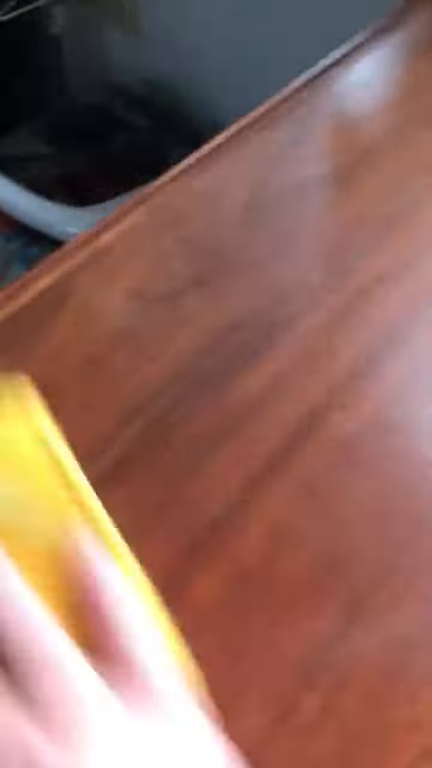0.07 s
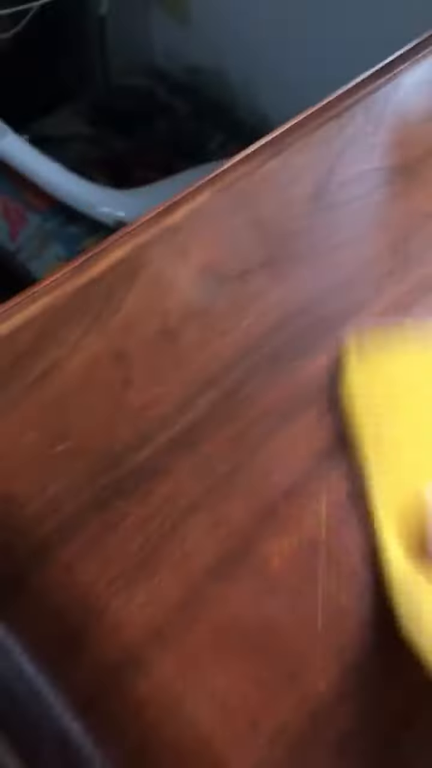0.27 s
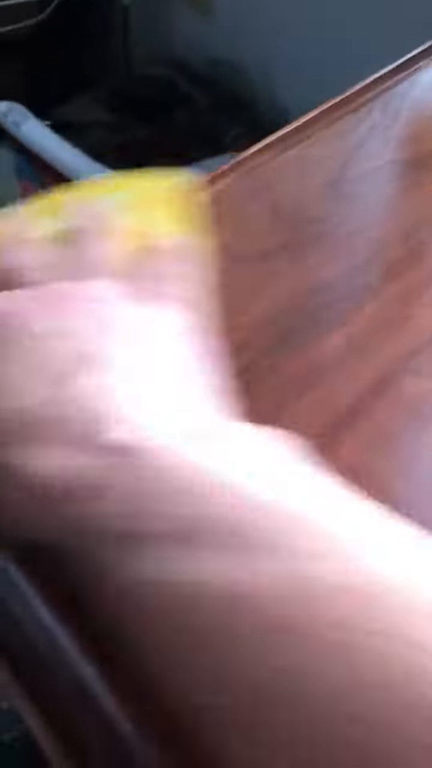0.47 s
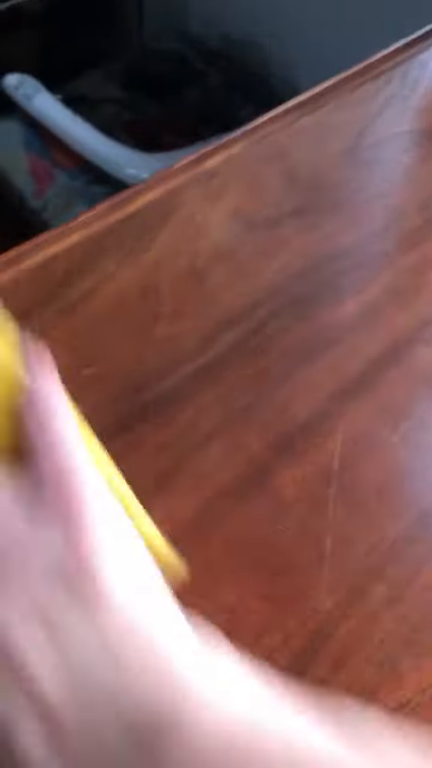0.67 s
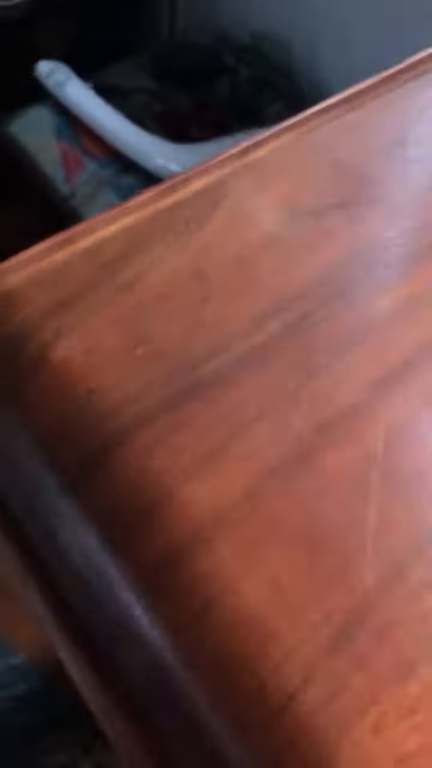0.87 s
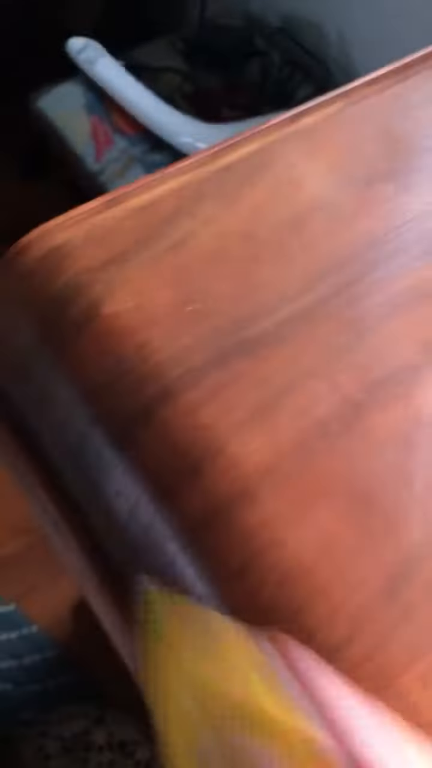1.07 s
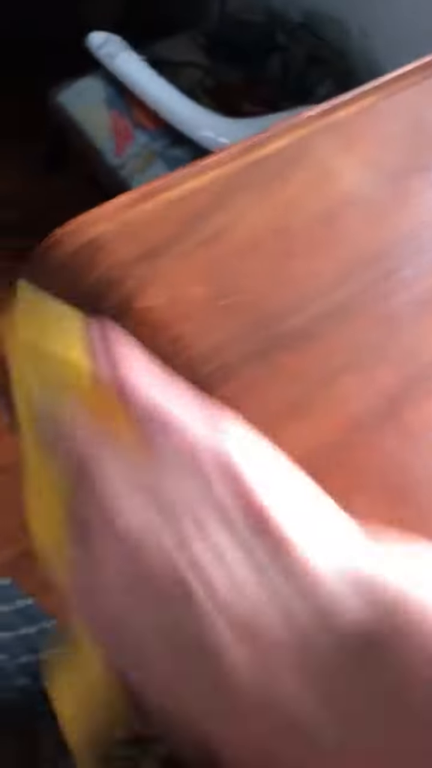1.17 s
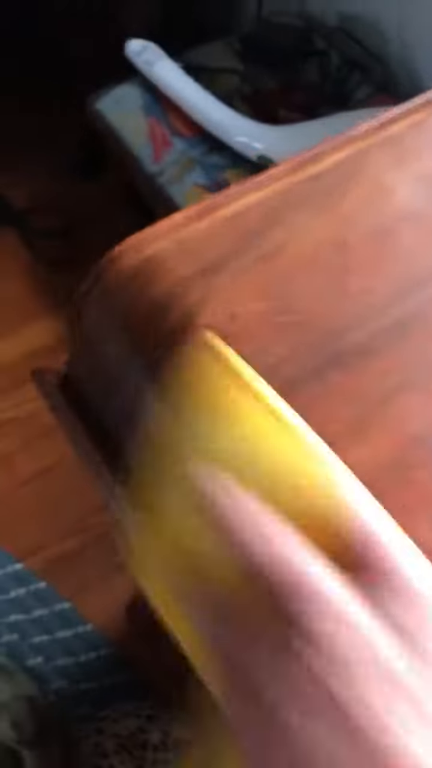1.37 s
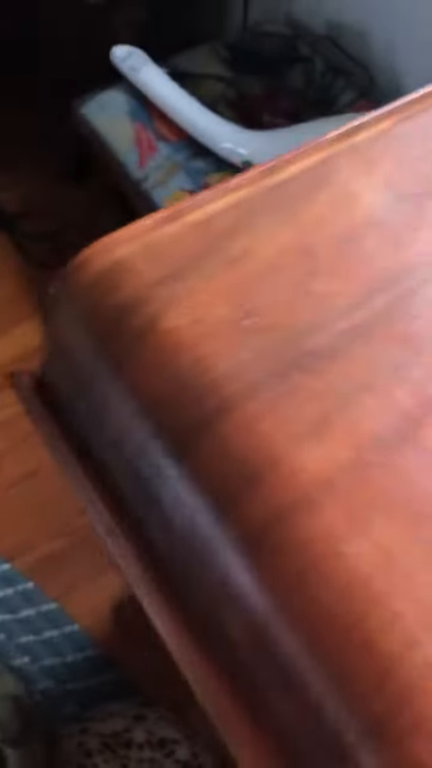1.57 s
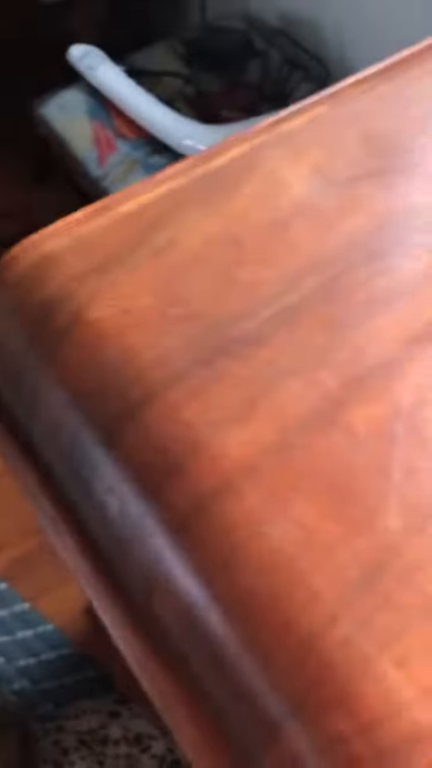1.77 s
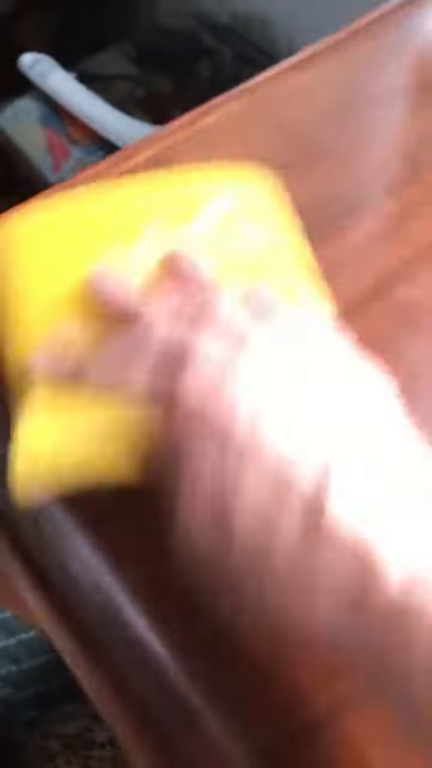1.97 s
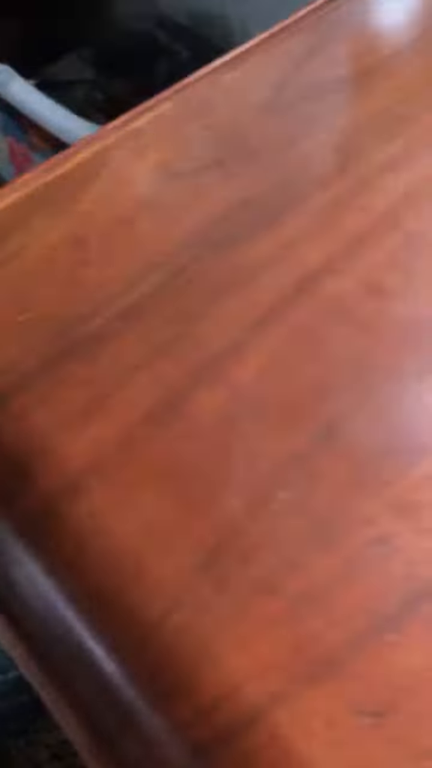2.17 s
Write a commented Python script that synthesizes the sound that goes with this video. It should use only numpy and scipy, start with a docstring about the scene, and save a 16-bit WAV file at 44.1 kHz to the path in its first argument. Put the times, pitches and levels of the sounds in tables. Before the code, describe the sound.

A soft cloth rubs back and forth over a waxed wooden table in seven quick, hissing strokes. The table gives a few light knocks and dull thumps early on. It is heard close by in a small, quiet room.

```python
"""Buffing a wooden table

A soft cloth rubs a waxed table top in seven quick strokes, close by in a small room.
Countless tiny fibre slips make a hiss that swells and brightens with the speed of the hand.
The wood murmurs under it, and a few jolts of the table each give a light knock and a dull thump.
Room air and a faint mains hum lie underneath."""
import sys
import numpy as np
from scipy import signal
from scipy.fft import rfft, irfft
from scipy.io import wavfile
from scipy.ndimage import uniform_filter1d

SR = 44100
rng = np.random.default_rng(int(sys.argv[2]) if len(sys.argv) > 2 else 0)


def persist_wave(psi):
    """Save psi, clipped to +-1, as 16-bit WAV."""
    counts = np.round(np.clip(psi, -1, 1) * 32767).astype(np.int16)
    wavfile.write(sys.argv[1], SR, np.atleast_2d(counts).T)


N = 98431
TIME = np.arange(N) / SR

# the tone of the room's still air: pitch_hz, level_db
AIR_SPECTRUM = [(20, -20), (55, -0.5), (100, -6.5), (170, -6.5), (320, -3.5), (500, -12.5), (900, -19.5),
                (2000, -15.5), (5000, -25), (10000, -29.5), (16000, -38)]
# the two tones of the mains hum: pitch_hz, level_db
HUM_TONES = [(59.6, -62.5), (120, -70.5)]
# the tone of the wood murmuring under the hand: pitch_hz, level_db
WOOD_SPECTRUM = [(20, -9), (45, 0), (90, 1.5), (130, 1.5), (160, -6.5), (230, -2), (300, -9.5), (380, -13),
                 (480, -23.5), (900, -28.5), (2000, -34)]
# how loud that murmur is: time_s, level_db
WOOD_LEVELS = [(0, -55.5), (.06, -52.5), (.13, -59), (.2, -48.5), (.3, -53), (.46, -55.5), (.6, -62.5),
               (.68, -55.5), (.76, -54.5), (.95, -66.5), (1.3, -63.5), (1.68, -66.5), (1.85, -65.5),
               (2.23, -61)]
# jolts of the table: start_s, knock_db, thump_db, thump_pitch_hz, thump_rise_s
JOLTS = [(0.038, -64, -54.5, 97, 0.01), (0.1933, -46.5, -32.5, 88.4, 0.0094),
         (0.243, -60.5, -38.5, 92, 0.0051), (.331, -47.5, -33.5, 90, 0.0079),
         (0.3817, -58.5, -38.5, 93, 0.0069), (.542, -85, -49, 65.5, 0.0075),
         (0.7173, -64, -42, 100, 0.0084), (.802, -75, -48, 96, 0.0067), (0.982, -59.5, -56, 285, 0.0043)]
# the tone of wood knocking on wood: pitch_hz, level_db
KNOCK_SPECTRUM = [(100, 5.5), (300, 1.5), (500, -2.5), (750, -1), (1000, 4), (1550, 2.5), (2300, -9),
                  (3500, -27), (8000, -23), (16000, -40)]
# low notes the table rings with after a thump: pitch_hz, level_db, fade_s
TABLE_NOTES = [(64, -13.5, .12), (122.6, -13.5, 0.39), (231, -20.5, 0.25), (284.4, -14, 0.089)]
# the tone of the slipping fibres: pitch_hz, level_db
HISS_SPECTRUM = [(200, -42), (700, -13), (1100, -10), (1450, -3.5), (2000, -3.5), (3000, -2), (4300, -1),
                 (4900, -4), (5250, -1.2), (7000, 0.1), (7500, -3), (8300, -0.5), (8650, -3.5), (9000, -3),
                 (9800, -2.5), (10300, -8), (11000, -5), (13000, -4.5), (14300, -7.5), (15700, -7)]
# one curve per stroke, following the hand's speed and pressure: time_s, level_db, treble_boost_db
STROKE_CURVES = [
    [(0, -53, 0), (.05, -53, -0.5), (.1, -55, 1.5), (.14, -51.5, -4.5), (.2, -51.5, -4), (.235, -59.5, 0.5),
     (.262, -61, 5.5), (.3, -62, 3.5)],
    [(.34, -60, 3.5), (.39, -60, 0.5), (.435, -55, 2), (.48, -57.5, .5), (.54, -59.5, -3), (.585, -66, 1),
     (.635, -66, 0)],
    [(.69, -57.5, -1.5), (.75, -53.5, -3.5), (.81, -50.5, -4.5), (.87, -55, 0), (.935, -55, -4),
     (.958, -63.5, 1), (.976, -74, 4)],
    [(1.01, -61, -3.5), (1.07, -54, -3), (1.13, -53.5, -1.5), (1.195, -53, -2.5), (1.265, -59, -2),
     (1.3, -68, 0.5)],
    [(1.35, -60, 0), (1.41, -55, 1), (1.45, -53.5, 1), (1.52, -50.5, 0), (1.555, -54.5, 4),
     (1.6, -56.5, -4), (1.645, -60.5, -3.5), (1.676, -78, 2)],
    [(1.7, -64, 0), (1.73, -57.5, 1), (1.82, -55, 4.5), (1.865, -52, 0), (1.89, -56.5, 2.5),
     (1.965, -56.5, 1.5), (2.015, -61.5, .5)],
    [(2.06, -56.5, -4), (2.1, -59, 6.5), (2.16, -56, 1), (2.23, -60, 3.5)],
]
# the ring of the hollow in the cupped cloth as the hand moves: time_s, pitch_hz, boost_db
CLOTH_HOLLOW = [(.03, 1700, 5.5), (.16, 1880, 7.5), (.3, 2580, 1), (.46, 1500, 5), (.68, 1600, 4.5),
                (.79, 2760, 2), (.9, 3300, 2.5), (1.1, 3450, 5), (1.22, 2510, 1.5), (1.45, 3520, 1.5),
                (1.55, 3560, 5.5), (1.9, 2040, -0.5), (2.15, 5600, -1)]
# the rise and fall of the very highest hiss: time_s, boost_db
TOP_BOOST = [(.05, 5.5), (.27, 1.5), (.45, 2.5), (.85, -1), (1.16, 1.5), (1.32, 8), (1.5, -4.5),
             (1.85, -.5), (2.15, -2)]
# the cloth catches on the wax: time_s, half_length_s, level_db, pitch_hz, width_octaves
WAX_CATCHES = [(0.187, 0.0028, -47.5, 8000, 1.6), (.789, 0.0068, -51.5, 2860, 0.05),
               (1.198, 0.018, -59.5, 1600, .3), (1.862, 0.0087, -50.5, 3500, 4.3),
               (1.95, 0.037, -58, 2070, 0.46)]


def amp(db):
    """Turns decibels into a number to multiply by."""
    return 10 ** (np.asarray(db) / 20)


def fade(t, fade_s):
    """Dies away by 60 dB every fade_s seconds."""
    return amp(-60 * t / fade_s)


def unit(x):
    """Scales each column to an average power of one."""
    return x / np.sqrt(np.mean(x ** 2, axis=0) + 1e-20)


def follow(rows, t):
    """Reads every column of a curve at the times t."""
    s, *columns = np.transpose(rows)
    return [np.interp(t, s, column) for column in columns]


def level_at(spectrum, hz):
    """Reads a spectrum's level in dB at the pitches hz."""
    pitch_hz, level_db = np.transpose(spectrum)
    return np.interp(np.log(hz + 1), np.log(pitch_hz), level_db)


def bell(hz, centre_hz, octaves):
    """A smooth hill of height one around a pitch."""
    return np.exp(-.5 * (np.log2((hz + 1) / centre_hz) / octaves) ** 2)


def shaped_noise(gain):
    """Noise whose strength at each pitch is shaped by gain(hz)."""
    hz = np.fft.rfftfreq(N, 1 / SR)
    return unit(irfft(rfft(rng.standard_normal(N)) * gain(hz), N))


def noise(spectrum):
    """Noise with the tone given in a table."""
    return shaped_noise(lambda hz: amp(level_at(spectrum, hz)))


def wobble(depth_db, rate_hz):
    """A gain that wanders up and down at random."""
    return amp(depth_db * shaped_noise(lambda hz: bell(hz, rate_hz, octaves=1)))


def air_and_hum():
    """The soft rush of room air and a steady mains hum."""
    hum = sum(amp(db) * np.sqrt(2) * np.sin(2 * np.pi * (hz * TIME + rng.random()))
              for hz, db in HUM_TONES)
    return amp(-63.5) * noise(AIR_SPECTRUM) + hum


def room_echo(sound):
    """The walls send back a short, faint tail of scattered echoes."""
    t = TIME[:SR // 2]
    echoes_per_s = 2000
    echoes = rng.standard_normal(len(t)) * (rng.random(len(t)) < echoes_per_s / SR)
    echoes *= (t > .004) * fade(t, fade_s=0.098)
    return amp(-12.5) * signal.fftconvolve(sound, echoes / np.linalg.norm(echoes))[:N]


def wood_murmur():
    """The dragging hand shakes the table top in uneven lumps."""
    lumps = unit(wobble(depth_db=2, rate_hz=26))
    level_db, = follow(WOOD_LEVELS, TIME)
    return noise(WOOD_SPECTRUM) * amp(level_db) * lumps


def table_jolts():
    """A short wooden knock, then the top heaves for about two swings and its low notes ring on."""
    knock_rise_s, thump_delay_s = 0.00039, 0.0048
    out = np.zeros(N)
    for start_s, knock_db, thump_db, thump_hz, rise_s in JOLTS:
        t = np.maximum(TIME - start_s, 0)
        tail = fade(t, fade_s=0.027) + amp(-5) * fade(t, fade_s=0.25)
        out += amp(knock_db) * np.minimum(t / knock_rise_s, 1) * tail * noise(KNOCK_SPECTRUM)
        t = np.maximum(t - thump_delay_s, 0)
        heave = (t / rise_s * np.exp(1 - t / rise_s)) ** 2 * np.sin(2 * np.pi * thump_hz * t)
        ring = sum(amp(db) * fade(t, fade_s) * np.sin(2 * np.pi * hz * t)
                   for hz, db, fade_s in TABLE_NOTES)
        out += amp(thump_db) * (heave + ring)
    return out


def fibre_slips():
    """Many tiny slips of uneven size over a smooth hiss, fluttering as the grip changes."""
    slips_per_s, spread_db, slip_share = 7000, 1.5, 0.3
    sizes = amp(spread_db * np.minimum(rng.exponential(1, N), 4)) * rng.choice([-1., 1.], N)
    slips = unit(sizes * (rng.random(N) < slips_per_s / SR))
    flutter = wobble(depth_db=0.34, rate_hz=45)
    return flutter * (np.sqrt(slip_share) * slips + np.sqrt(1 - slip_share) * rng.standard_normal(N))


def cloth_strokes():
    """Each stroke swells and brightens the fibre hiss, and the hollow under the hand colours it."""
    # cut the hiss into short slices, so each can have its own tone
    slicing = dict(fs=SR, nperseg=256, noverlap=192)
    hz, t, slices = signal.stft(fibre_slips(), **slicing)
    hz = hz[:, None]
    rub_db, treble_db = follow([row for stroke in STROKE_CURVES for row in stroke], t)
    hollow_hz, hollow_db = follow(CLOTH_HOLLOW, t)
    top_db, = follow(TOP_BOOST, t)
    tone = amp(level_at(HISS_SPECTRUM, hz))
    tone = tone * amp(hollow_db * bell(hz, hollow_hz, octaves=0.27))
    tone *= amp(top_db * bell(hz, centre_hz=14100, octaves=0.21))
    treble_from_hz = 5270
    low_share = 1 / (1 + (hz / treble_from_hz) ** 10)
    rub = amp(rub_db) * unit(tone * np.sqrt(low_share))
    treble = amp(rub_db + treble_db) * unit(tone * np.sqrt(1 - low_share))
    # the soft, low brush of the cloth pad swells only a little with the rub
    brush_db = -73 + 0.14 * (rub_db - rub_db.mean())
    brush = amp(brush_db) * unit(bell(hz, centre_hz=1026, octaves=0.9))
    power = rub ** 2 + treble ** 2 + brush ** 2
    for time_s, half_length_s, level_db, pitch_hz, octaves in WAX_CATCHES:
        catch = amp(level_db) * np.exp(-.5 * ((t - time_s) / half_length_s) ** 2)
        power += (catch * unit(tone * bell(hz, pitch_hz, octaves))) ** 2
    # random patches of pitch and time come out a little louder or softer
    patches = uniform_filter1d(rng.standard_normal(slices.shape), size=4, axis=0)
    patches = uniform_filter1d(patches, size=24, axis=1)
    patch_db = 1.5 * patches / patches.std()
    _, hiss = signal.istft(slices * np.sqrt(power) * amp(patch_db), **slicing)
    return hiss[:N]


def scene():
    """Cloth and table in the room, the same in both channels."""
    near = cloth_strokes() + wood_murmur() + table_jolts()
    mono = near + room_echo(near) + air_and_hum()
    return np.array([mono, mono])


def record(dry):
    """The small microphone loses the deepest bass; then the highest treble is cut off."""
    low_cut_hz, high_cut_hz = 33, 15750
    bass_cut = signal.butter(2, low_cut_hz, "highpass", fs=SR, output="sos")
    treble_cut = signal.firwin(511, high_cut_hz, window=("kaiser", 9), fs=SR)
    return signal.oaconvolve(signal.sosfilt(bass_cut, dry), treble_cut[None], "same")


dry = scene()
out = record(dry)
persist_wave(out)
```